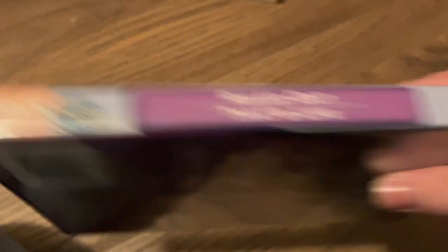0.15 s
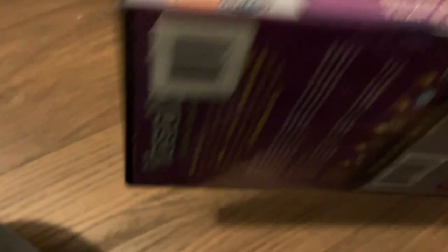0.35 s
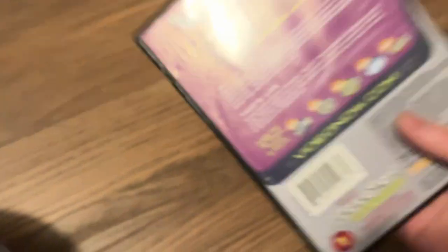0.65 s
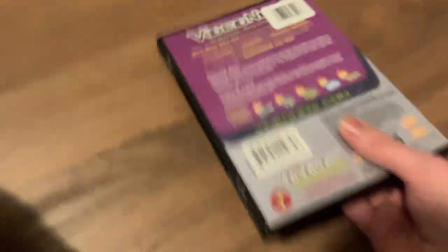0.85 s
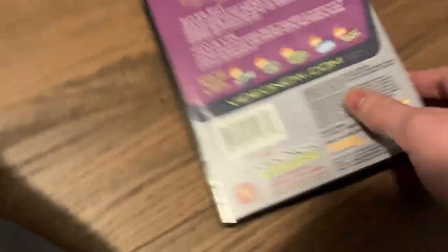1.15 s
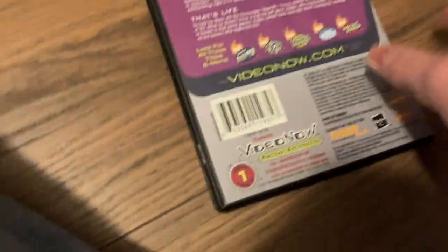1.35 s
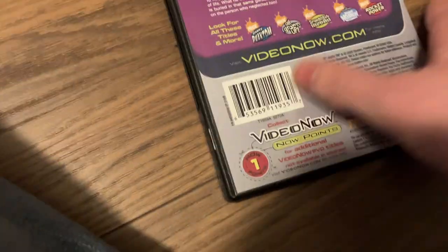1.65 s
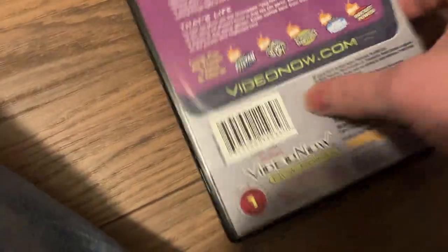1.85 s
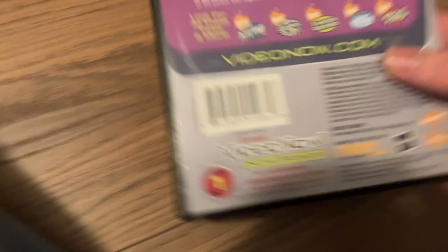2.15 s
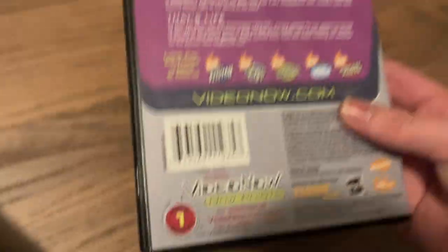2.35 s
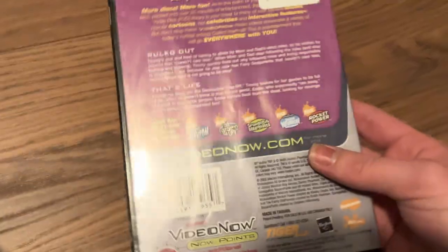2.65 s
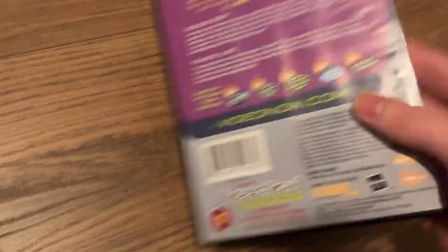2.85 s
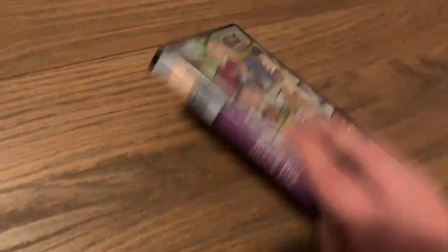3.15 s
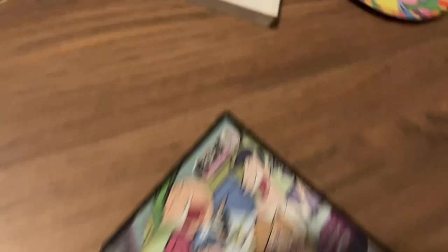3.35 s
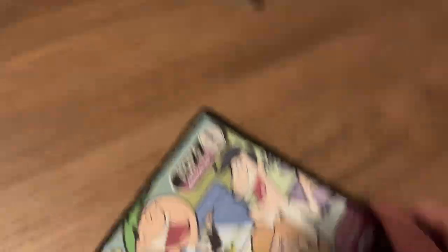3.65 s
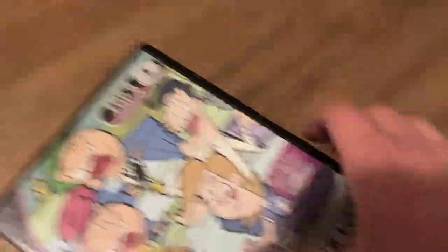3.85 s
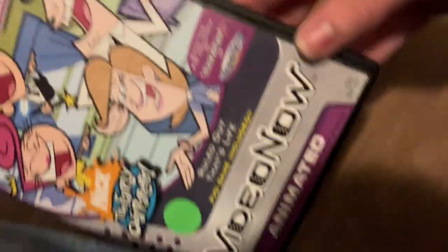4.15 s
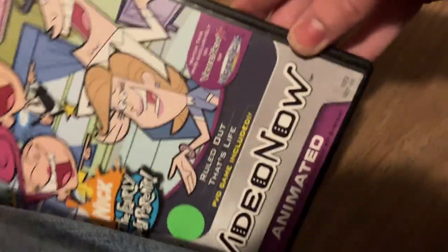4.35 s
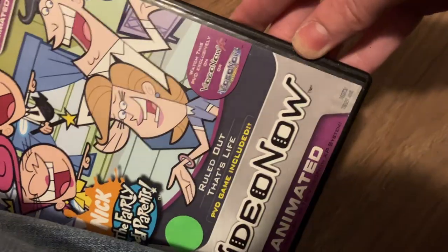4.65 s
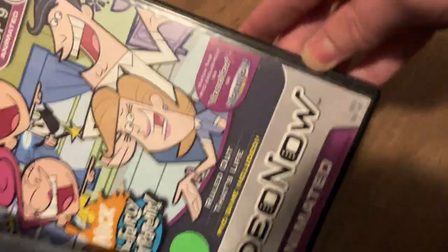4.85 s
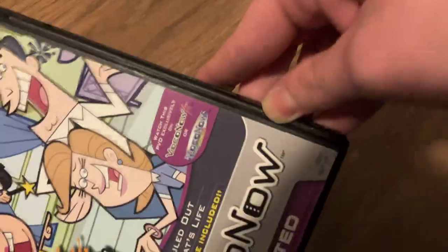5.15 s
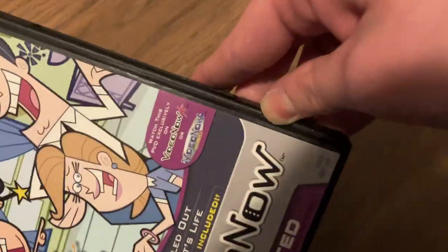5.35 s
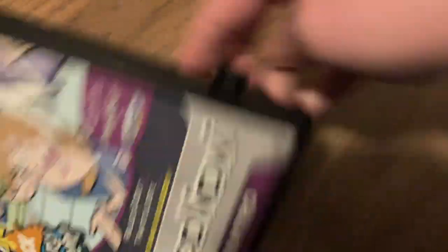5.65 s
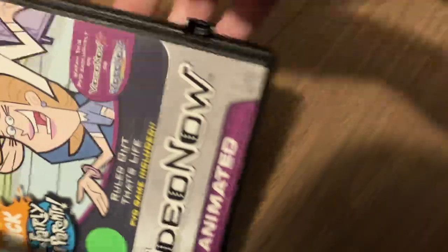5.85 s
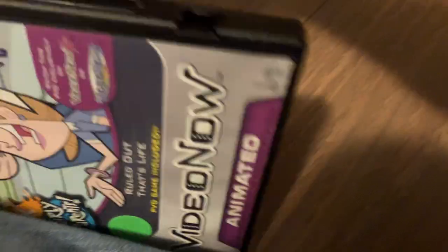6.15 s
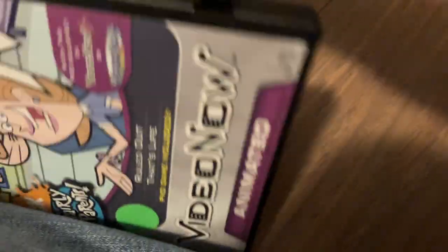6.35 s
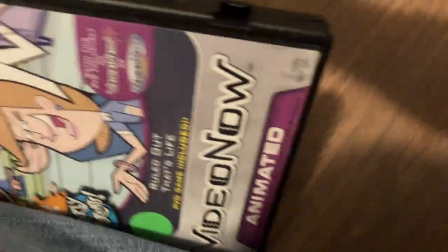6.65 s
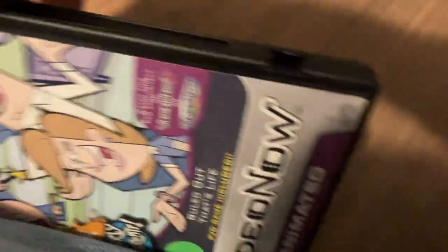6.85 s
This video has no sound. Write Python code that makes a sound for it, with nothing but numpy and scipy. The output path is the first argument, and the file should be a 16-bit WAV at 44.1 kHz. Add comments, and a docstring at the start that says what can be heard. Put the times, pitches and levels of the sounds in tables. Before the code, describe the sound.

A close, dry stereo pickup in a small furnished room with a very faint low floor noise. Barely audible finger friction opens the scene. From 0.87 to 1.03 seconds a thin hollow plastic case gives a quick cluster of clacks with short rubs, then a loud bright knock at 1.16 and a fuller one at 1.33. A thumb wipes the cover in two short dry strokes at 1.8 to 2.0, with soft low bumps, then it is nearly quiet. The loudest sharp clack comes at 3.13, followed by knocks at 3.2 and 3.4 and gritty sliding on wood from 3.7 to 4.05. Lighter taps fall at 4.3 to 4.55, then a lull. At 5.39 to 5.47 the latch snaps in rapid crisp clicks with a low bump. Until the end, the loose lid shuffles and ticks softly, with a thin fluttering hinge squeak around 6.2 to 6.5.

```python
"""In a small room, close to the microphone, a plastic disc case is turned over by hand and set on a wooden table.
Knocks, taps and the snapping latch are blows: crack, bending wave, chattering edge, rattling halves.
Fingers, thumb, shell and lid rub: shell-coloured grains of noise that swell to a crest and ease off.
The hinge squeaks thinly in fluttering partials; soft low bumps, room reflections and a faint floor lie beneath."""
import sys
import numpy as np
from scipy import signal
from scipy.fft import rfft, irfft, next_fast_len
from scipy.io import wavfile

SR = 44100
rng = np.random.default_rng(int(sys.argv[2]) if len(sys.argv) > 2 else 0)


def generate_wav(signal):
    """Clip the signal to [-1, 1] and save it as 16-bit WAV at the path in sys.argv[1]."""
    frames = np.transpose(np.atleast_2d(signal))
    scaled = np.clip(frames, -1, 1) * 32767
    pcm = np.round(scaled).astype(np.int16)
    wavfile.write(sys.argv[1], SR, pcm)


N = 308259
HZ = np.fft.rfftfreq(N, 1 / SR)
EDGE_HZ = 16750  # upper band limit
FLOOR_DB = -66.5
WEIGHT_HZ = 334  # the weight behind a blow lifts the thud below this
HARD_HZ = 3880  # a hard, short contact lifts the tick above this

# Background noise colour. Each row: frequency in Hz, relative density in dB per Hz.
FLOOR_TONE = [(15, -37), (25, 2), (84, -5), (344, -20.5), (863, -25.5), (1940, -20), (2690, -26.5),
              (7310, -33.5), (9320, -35), (11600, -36), (13600, -54), (16000, -40)]
# Decay of the room. Each row: frequency in Hz, time to fall 60 dB in seconds.
ROOM_T60_S = [(100, 0.12), (300, 0.25), (900, 0.26), (3000, 0.3), (7000, 0.24), (15000, 0.24)]
# Strength of the reflections. Each row: frequency in Hz, level in dB.
ROOM_WET_DB = [(100, -2), (300, -8.5), (900, -8), (3000, -5), (7000, -9.5), (15000, -13.5)]
# Likeness of diffuse sound at the two ports. Each row: frequency in Hz, left-right likeness (0-1).
PORT_LIKENESS = [(100, 0.89), (400, .8), (900, 0.072), (1700, 0.2), (5000, 0.52), (7000, 0.43), (9000, 1),
                 (16000, 1)]
# Level balance of the ports. Each row: frequency in Hz, left over right in dB.
PORT_BALANCE_DB = [(60, 3.5), (220, 2), (380, 2.5), (700, 6.5), (1300, 4.5), (2400, 4), (4400, 1),
                   (8100, -0.5), (16000, 0)]
# Phase between the ports; in the treble the right one leads. Each row: frequency in Hz, lead of the left in
# radians.
PORT_PHASE_RAD = [(0, .3), (1400, .3), (2100, 2.4), (4000, 0), (6800, -6.3), (17000, -20.5)]

# Dull bumps of the hand that holds the microphone. Each row: start in seconds, pitch in Hz, level in dB.
HAND_BUMPS = [(1.905, 47.94, -44), (1.976, 50.1, -44), (2.055, 51, -46), (2.166, 58, -41.5),
              (5.4, 50, -31.5), (5.68, 51.5, -41.5), (6.021, 50, -44)]
# Hinge squeak. Each row: time in seconds, pitch of the strongest partial in Hz, relative level in dB.
SQUEAK_PATH = [(6.17, 1825, -71.5), (6.194, 1850, -60.5), (6.238, 1890, -67), (6.276, 1843, -55.5),
               (6.294, 1870, -68.5), (6.376, 1867, -59), (6.544, 1814, -73), (6.55, 1874, -84)]
# Partials of the squeak. Each row: multiple of the fundamental, relative level in dB.
PARTIALS = [(2, -3), (3, -9), (4, 0), (5, -19), (6, -12), (7, -15), (8, -17), (10, -19), (11, -21)]

# Resonances of the shell. Each row: frequency in Hz, width in Hz, lift in dB.
SHELL_MODES = [(146, 81, 3), (206, 33, 3.5), (302, 110, 3.5), (468, 23, 5), (824, 440, 4), (1161, 160, 2.5),
               (1698, 22, 3.5), (3082, 1500, -2), (3190, 62, -2), (4640, 690, 2.5), (7475, 4200, 6.5)]
# Resonances of the loose lid resting on the table. Each row: frequency in Hz, width in Hz, lift in dB.
LOOSE_LID_MODES = [(155, 11, 0.5), (210, 19, 10.5), (282, 83, 8.5), (421, 39, 13.5), (766, 430, 9)]

# Strokes: fingers shifting their grip, thumb on the cover, shell on the wood, open lid shuffled about.
# Each row: start in seconds, length in seconds, crest as a share of the length (0-1), mid-band level in dB,
# bass drag in dB, treble hiss in dB (both relative to the mid band).
GRIP_STROKES = [(0.113, 0.26, 0.29, -78.5, -3, 14.5), (0.461, .27, 0.7, -66, -7, 4.5),
                (0.92, 0.11, 0.27, -47.5, 1, -8.5), (1.027, .06, 0.26, -43.5, 3.5, -14),
                (1.095, 0.096, 0.5, -50, -1, -2.5), (2.028, 0.079, .4, -67, 16, -4),
                (2.768, 0.29, 0.55, -72, -2, 3.5), (2.981, 0.15, 1, -60, 2, 0),
                (4.06, .09, 0.1, -55.5, 12, -2.5), (4.131, 0.1, 0.12, -73, 4, 13),
                (4.204, 0.082, 0.87, -56.5, 8, -4), (4.579, 0.071, 0.2, -61, 7, -11.5),
                (4.799, 0.055, 0.57, -72, 7.5, -8), (4.937, 0.084, 0.34, -69.5, 7, -2),
                (5.093, 0.064, 0.32, -70, 13.5, -2)]
THUMB_STROKES = [(1.768, 0.1, 0.52, -33.5, -10, 0), (1.916, .083, 0.84, -34, -12.5, 0.5)]
SLIDE_STROKES = [(3.23, 0.045, 0.7, -44.5, -3, -11), (3.28, .1, 0.72, -43, -8.5, -8),
                 (3.725, .07, 0.29, -42, -11, -3.5), (3.808, .06, 0.33, -35.5, -21, -14.5),
                 (3.886, .085, 0.31, -31.5, -9, -14.5), (3.979, .085, 0.58, -32.5, -10.5, -15)]
LID_STROKES = [(5.476, 0.085, 0, -45.5, 13, -25), (5.585, 0.08, .25, -48, 15, -11.5),
               (5.659, 0.096, 0.32, -38, 0, -10.5), (5.745, .08, 0.33, -42.5, 3, -12.5),
               (5.797, 0.098, 0.4, -62, -1, 8.5), (5.869, 0.077, 0.38, -44.5, 3.5, -6.5),
               (5.985, 0.12, 0.18, -35, -2, -15.5), (6.112, 0.065, 0.58, -42, 3, -5.5),
               (6.18, 0.094, 0.62, -53.5, 6, -15.5), (6.29, 0.072, 0.9, -58, 1, -9),
               (6.358, 0.046, 0.33, -52.5, 12, -1.5), (6.383, 0.1, 0.1, -48.5, 5.5, -24),
               (6.489, 0.14, 0.42, -61, 8, -10.5), (6.607, 0.054, 0.57, -43.5, 12.5, -12),
               (6.664, .05, 0.07, -62, 17, -2.5), (6.786, 0.064, .5, -61, 12, -7),
               (6.847, 0.064, 0.65, -62.5, 17.5, -8), (6.941, 0.063, 0.62, -49.5, 6, -13)]
# Colours of these strokes. Each row: frequency in Hz, relative density in dB per Hz.
GRIP_COLOUR = [(71, -49), (120, -5.5), (355, -13.5), (418, -13), (839, 1), (1860, -3), (6910, -19),
               (9210, -21.5), (16000, -20)]
THUMB_COLOUR = [(24, -39), (40, 4.5), (312, 6.5), (402, -5), (852, 4), (965, -3.5), (3140, -19.5),
                (7930, -43.5), (9220, -47), (10700, -46.5), (13800, -49), (16000, -59)]
SLIDE_COLOUR = [(24, -74), (40, -16.5), (194, 11), (269, 2), (422, 3), (570, -3), (873, 3), (1810, -13.5),
                (7170, -30.5), (9220, -36), (11000, -34.5), (12800, -37), (13800, -75), (14800, -34.5),
                (16000, -49.5)]
LID_COLOUR = [(24, -49), (40, -20), (171, -11), (209, -14), (345, -24.5), (615, -22), (1440, -25),
              (1680, -22), (2000, -24), (6820, -27), (9220, -34.5), (11300, -37), (16000, -45)]

# Colour of an average blow. Each row: frequency in Hz, relative level in dB.
BLOW_COLOUR = [(70, 7), (140, 8.5), (260, 6.5), (400, 0.5), (950, 0.5), (3200, -7), (9500, -19.5),
               (16750, -25.5)]
# The case knocking on the wood and fingers tapping it; then the catches of the latch snapping free.
# Each row: start in seconds, strength in dB, weight in dB, hardness in dB, panel ring in Hz,
# edge ring in Hz, edge ring lift in dB, relative left-right lean in dB.
KNOCKS = [(0.8739, 14.5, -13.5, 3.5, 885, 3570, 11.5, 3), (0.8869, 6.5, 5.5, -7, 735, 3470, 20, -2.5),
          (0.9, 8.5, -0.5, -11.5, 720, 3260, 15, 2), (1.0121, 10, -4.5, -5.5, 980, 4070, 12.5, -3.5),
          (1.1633, 21.5, -7, 2.5, 800, 5800, 5.5, 8), (1.333, 14.5, 7.5, 4.5, 1460, 5930, 5.5, 8),
          (1.6907, -11, 7, 2.5, 460, 3370, 4, -0.5), (1.998, -9.5, 16.5, 11.5, 855, 3070, 4, 4),
          (2.8427, -25.5, -9.5, 18.5, 840, 8060, -1.5, 1), (2.9784, -23, 12, 8.5, 728, 3870, 0.5, 3.5),
          (3.1251, 24.5, -9, -1.5, 867, 5500, 5.5, 6), (3.21, 8, -4.5, -7.5, 1040, 3200, 13.5, 8),
          (3.397, 17.5, 0, 6.5, 594, 5400, -1, 7.5), (3.583, -13.5, -17, -36.5, 815, 2390, 2.5, -6),
          (3.6788, -6.5, 2.5, -31, 688, 4130, 6, 6), (3.878, 2, 1.5, -8, 462, 4320, 10.5, 5.5),
          (4.2873, 2.5, 6.5, -2.5, 795, 4280, 5.5, 0.5), (4.4371, -1.5, 10, -9, 479, 2570, 10, 1.5),
          (4.5528, 0, 7.5, -2.5, 800, 4930, 6, 5.5), (4.63, -23, 7.5, -8, 800, 3000, 3.5, 3),
          (5.4355, 7, 6, -11, 806, 5760, 3, 8.5), (5.769, -7, 3, -7, 845, 2280, 9, 9.5),
          (5.959, -12.5, -14, -4, 744, 2580, 22, 1), (6.137, -9.5, 2, 10, 960, 4300, 12, 3),
          (6.368, -20, 14.5, -7, 633, 3720, 4, 1.5)]
LATCH_SNAPS = [(5.3888, 13, -2.5, 17, 856, 4320, 8, 7), (5.3955, 12, -8, -10, 1630, 7730, 4, 6),
               (5.4081, 8, 6, 18, 1860, 3770, 6, 5.5), (5.4653, 6.5, 17.5, 6, 870, 4380, 7, 6.5),
               (5.697, -10, 24, 26, 774, 6700, 13, 6.5)]


def amp(db):
    """Decibels to gain."""
    return 10 ** (np.asarray(db) / 20)


def unit(x):
    """Scales to rms 1."""
    return x / np.sqrt(np.mean(x ** 2) + 1e-20)


def read(points, hz):
    """Joins (Hz, value) points on a log-frequency axis."""
    point_hz, value = np.transpose(points)
    return np.interp(np.log(hz + 1), np.log(point_hz + 1), value)


def lift(modes, hz):
    """The dB that a set of resonances adds at each frequency."""
    return sum(db / (1 + (2 * (hz - mode_hz) / width_hz) ** 2) for mode_hz, width_hz, db in modes)


def causal(db):
    """Spectrum of the promptest (minimum-phase) pulse that has this gain."""
    log_gain = np.log(amp(np.maximum(db, -100)))
    circle = np.concatenate([log_gain, log_gain[-2:0:-1]])
    return np.exp(np.conj(signal.hilbert(circle)))[:len(db)]


def pair(noise):
    """Spectra of two unrelated signals, made as alike as diffuse sound is at the two ports."""
    left, other = rfft(noise)
    same = np.clip(read(PORT_LIKENESS, np.fft.rfftfreq(noise.shape[1], 1 / SR)), 0, 1)
    return np.array([left, same * left + np.sqrt(1 - same ** 2) * other])


def add(mix, start_s, sound):
    """Mixes a sound in at its start time."""
    part = mix[:, max(round(start_s * SR), 0):][:, :sound.shape[1]]
    part += sound[:, :part.shape[1]]


def wander(length, size):
    """Smooth chance of rms 1 that changes over about size samples."""
    return unit(signal.oaconvolve(rng.standard_normal(length), np.hanning(2 * size), "same"))


def floor():
    """The low rumble and faint hiss of a quiet house: coloured noise."""
    noise = pair(rng.standard_normal((2, N))) * amp(read(FLOOR_TONE, HZ))
    return amp(FLOOR_DB) * unit(irfft(noise, N))


def room(x, first_s=0.0051, size=32768):
    """A small furnished room: dense reflections, each band dying at its own speed."""
    hz, t, bands = signal.stft(irfft(pair(rng.standard_normal((2, size)))), SR, nperseg=256)
    t60_s = read(ROOM_T60_S, hz)[:, None]
    decay = np.exp(-np.log(1000) * t / t60_s)
    even_energy = np.sqrt(2 * np.log(1000) / (t60_s * SR))
    bands *= amp(read(ROOM_WET_DB, hz)[:, None]) * decay * even_energy
    tail = signal.istft(bands, SR, nperseg=256)[1][:, :size]
    tail = tail * np.clip(np.arange(size) / SR / first_s - 1, 0, 1)  # silent to first_s, full at twice that
    return signal.fftconvolve(x.mean(0)[None], tail, axes=1)[:, :N]


def bump(start_s, hz, level_db, rise_s=0.011):
    """A soft push that swells and dies within a few cycles."""
    t = np.arange(SR // 4) / SR
    swell = t / rise_s * np.exp(1 - t / rise_s)
    push = amp(level_db) * swell * np.sin(2 * np.pi * hz * t)
    return start_s, np.array([push, push])


def hinge(level_db=4.5, flutter_db=3, right_db=-12):
    """The hinge sticks and slips about 460 times a second; its fourth partial sings out, and each one flutters."""
    s, hz, db = np.transpose(SQUEAK_PATH)
    t = np.arange(s[0], s[-1], 1 / SR)
    pitch_hz = np.interp(t, s, hz) * (1 + .004 * wander(len(t), size=200))
    turns = np.cumsum(pitch_hz) / SR / 4  # cycles of the fundamental
    tone = 0
    for multiple, partial_db in PARTIALS:
        gain = amp(partial_db + flutter_db * wander(len(t), size=1200))
        tone = tone + gain * np.sin(2 * np.pi * round(multiple) * turns)
    tone *= np.sqrt(2) * amp(np.interp(t, s, db) + level_db) * signal.windows.tukey(len(t), .1)
    return s[0], np.array([tone, tone * amp(right_db)])  # nearer the left port


def pressure_db(t, start_s, length_s, crest, ease_db):
    """The hand leans into a stroke up to its crest and lets go; at start and end it is ease_db lighter."""
    rise_s = length_s * np.clip(crest, .05, .95)
    since_crest = t - start_s - rise_s
    along = np.maximum(-since_crest / rise_s, since_crest / (length_s - rise_s))
    return -ease_db * along ** 1.5


def rub(stroke, tone, modes, grains_per_s, grain_db, smooth, judder_db, judder_hz, ease_db,
        rim=0.18, rim_s=.0016):
    """Surfaces catch and slip in tiny grains that the resonances colour; the pressure judders."""
    start_s, length_s, crest, level_db, drag_db, hiss_db = stroke
    t = np.arange(start_s - .04, start_s + length_s + .04, 1 / SR)
    size = next_fast_len(len(t) // 2 + 1) * 2
    hz, n = np.fft.rfftfreq(size, 1 / SR), np.arange(size)
    grain_gain = amp(grain_db * np.minimum(rng.exponential(1, size), 3))
    grains = (rng.random(size) < grains_per_s / SR) * grain_gain
    slips = rng.standard_normal((2, size)) * (unit(grains) + smooth)
    # the wave returning from the rim comes later as the contact moves on, so the colour shifts
    trip = rim_s * SR * (1 + n / size / 2)
    slips = slips + rim * np.array([np.interp(n - trip, n, side) for side in slips])
    slips = pair(slips) * amp(read(tone, hz) + lift(modes, hz))
    slow_noise = rfft(rng.standard_normal(size)) / (1 + (hz / judder_hz) ** 4)
    judder = unit(irfft(slow_noise))[:len(t)]
    low, high = 1 / (1 + (hz / 350) ** 6), 1 / (1 + (1800 / (hz + 1)) ** 6)
    push_db = level_db + pressure_db(t, start_s, length_s, crest, ease_db)
    out = 0
    for band, band_db in (low, drag_db), (1 - low - high, 0), (high, hiss_db):
        grit = unit(irfft(slips * band)[:, :len(t)] * amp(judder_db * judder))
        out = out + grit * amp(push_db + band_db)
    return t[0], out * np.sqrt(signal.windows.tukey(len(t), .04 / (t[-1] - t[0])))


def grip(stroke):
    """Fingers shift on the plastic: mostly smooth friction with little judder."""
    return rub(stroke, GRIP_COLOUR, SHELL_MODES, grains_per_s=650, grain_db=0.0, smooth=3.2,
               judder_db=0.2, judder_hz=35, ease_db=16)


def thumb(stroke):
    """The thumb wipes over the cover: uneven grains over less smooth friction."""
    return rub(stroke, THUMB_COLOUR, SHELL_MODES, grains_per_s=1200, grain_db=1.5, smooth=0.7,
               judder_db=0.56, judder_hz=90, ease_db=12)


def slide(stroke):
    """The shell slides on the wood: dense grains, with a pressure that eases only a little."""
    return rub(stroke, SLIDE_COLOUR, SHELL_MODES, grains_per_s=1700, grain_db=-1.5, smooth=0.99,
               judder_db=0.8, judder_hz=62.6, ease_db=4.5)


def shuffle_lid(stroke):
    """The open lid is shuffled about: its own resonances and the strongest judder."""
    return rub(stroke, LID_COLOUR, LOOSE_LID_MODES, grains_per_s=1100, grain_db=0.0, smooth=1.0,
               judder_db=1.6, judder_hz=56.7, ease_db=10)


def blow(row, level_db=-3.0, ring_db=4, bend_s=.0026, chatter_s=0.0036, crack_s=0.0015, chatter_hz=1400,
         crack_hz=5000, rattle_db=-8, rattle_s=0.015, rattles_per_s=500, low_hz=100,
         rim=0.23, rim_hz=2200, size=8192):
    """One contact: a crack, a bending wave through the shell, a chattering edge and rattling halves."""
    start_s, strength_db, weight_db, hard_db, ring_hz, edge_hz, edge_db, pan_db = row
    hz, t = np.fft.rfftfreq(size, 1 / SR), np.arange(size) / SR
    # the struck spot favours two broad, quickly damped resonances of its own
    modes = SHELL_MODES + [(ring_hz, ring_hz / 3, ring_db), (edge_hz, edge_hz / 7, edge_db)]
    colour_db = level_db + strength_db + read(BLOW_COLOUR, hz) + lift(modes, hz)
    colour_db += weight_db / (1 + (hz / WEIGHT_HZ) ** 2)
    colour_db += hard_db * hz ** 2 / (hz ** 2 + HARD_HZ ** 2)
    colour_db -= 10 * np.log10(1 + (low_hz / (hz + 1)) ** 3)
    # bending waves travel as the root of frequency: tick first, thud last; bend_s scales the lag
    lag_s = bend_s * (np.sqrt(1e3 / (hz + low_hz)) - np.sqrt(1e3 / EDGE_HZ))
    bending = np.exp(-2j * np.pi * np.cumsum(lag_s) * SR / size)
    # the edge chatters densely as it presses in; the loose halves touch again in separate small ticks
    touches = rng.random(size) < rattles_per_s / SR
    crack_shape = np.exp(-t / crack_s)
    chatter_shape = np.sqrt(t) * np.exp(-2 * t / chatter_s)
    rattle_shape = (touches + 0.05) * np.exp(-t / rattle_s)
    crack, chatter, rattle = (pair(unit(rng.standard_normal((2, size)) * shape)) / np.sqrt(size)
                              for shape in (crack_shape, chatter_shape, rattle_shape))
    # long waves feel one push, shorter ones every micro-contact, the shortest only the first crack
    long_waves, short_waves = 1 / (1 + (hz / chatter_hz) ** 4), 1 - 1 / (1 + (hz / crack_hz) ** 4)
    force = np.sqrt(long_waves) + np.sqrt(1 - long_waves) * chatter
    force = force + amp(rattle_db) * rattle * hz / (hz + low_hz)
    force = np.sqrt(1 - short_waves) * force + np.sqrt(short_waves) * crack
    # the wave returns from the rim two cycles of the panel ring later and ripples the spectrum
    force = force * (1 + rim * np.exp(-4j * np.pi * hz / ring_hz) / (1 + (hz / rim_hz) ** 2))
    # half the lean, taken from the mean of the knocks
    side_db = (pan_db - np.mean(np.array(KNOCKS)[:, -1])) / 2
    lead = size // 128  # samples kept ahead of the contact
    sound = np.roll(irfft(force * bending * causal(colour_db)), lead, axis=1)
    sound = sound * (1 - (t / t[-1]) ** 2)
    return start_s - lead / SR, sound * amp([[side_db / 2], [-side_db / 2]])


def snap_latch(row):
    """A catch snaps free: a blow with a longer crack and a stronger, shorter, sparser rattle."""
    return blow(row, crack_s=.0018, rattle_db=-6, rattle_s=0.01, rattles_per_s=390)


def scene():
    """Blows, latch, rubs and squeak sound together in the room; bumps reach the microphone directly."""
    case, handling = np.zeros((2, N)), np.zeros((2, N))
    for row in HAND_BUMPS:
        add(handling, *bump(*row))
    add(case, *hinge())
    for source, rows in ((grip, GRIP_STROKES), (thumb, THUMB_STROKES), (slide, SLIDE_STROKES),
                         (shuffle_lid, LID_STROKES), (snap_latch, LATCH_SNAPS), (blow, KNOCKS)):
        for row in rows:
            add(case, *source(row))
    return case + room(case) + handling + floor()


def record(dry, low_cut_hz=38):
    """Two microphone ports that differ in level and phase, a low cut, a soft ceiling and the band limit."""
    tilt = amp(np.outer([.5, -.5], read(PORT_BALANCE_DB, HZ)))
    tilt = tilt / np.sqrt(np.mean(tilt ** 2, axis=0))
    turn = np.exp(1j * np.outer([.5, -.5], np.interp(HZ, *np.transpose(PORT_PHASE_RAD))))
    ports = irfft(rfft(dry) * turn * tilt, N)
    ports = signal.sosfilt(signal.butter(3, low_cut_hz, "high", fs=SR, output="sos"), ports)
    ports = ports / (1 + (ports / .95) ** 8) ** (1 / 8)
    band_limit = signal.firwin(255, EDGE_HZ, window=("kaiser", 9), fs=SR)
    return signal.oaconvolve(ports, band_limit[None], "same")


dry = scene()
out = record(dry)
generate_wav(out)
```